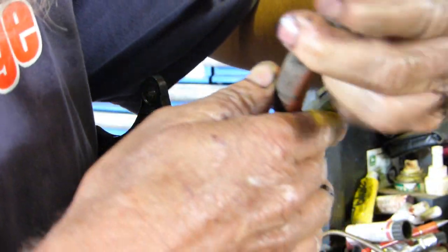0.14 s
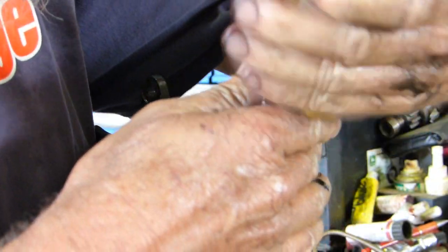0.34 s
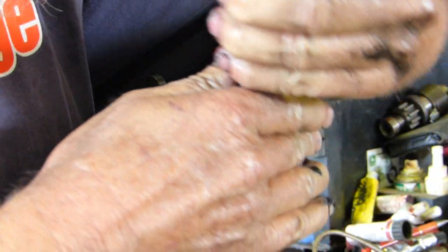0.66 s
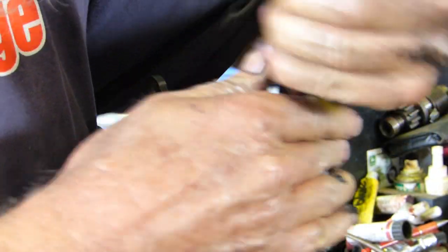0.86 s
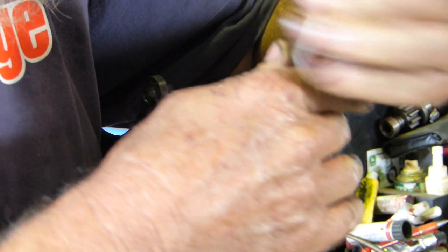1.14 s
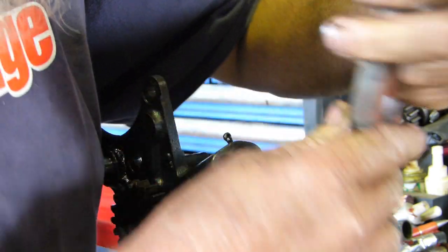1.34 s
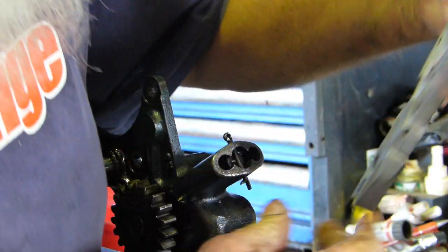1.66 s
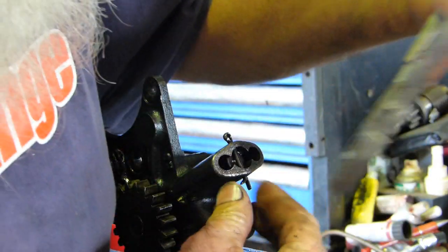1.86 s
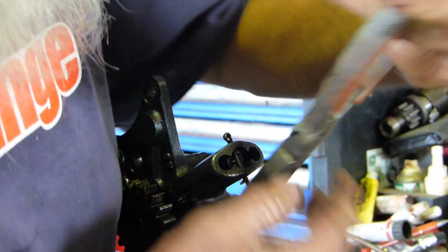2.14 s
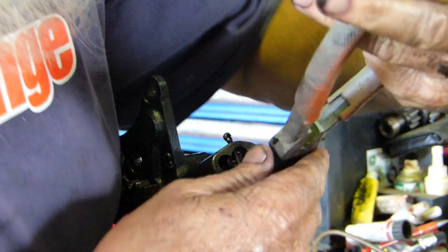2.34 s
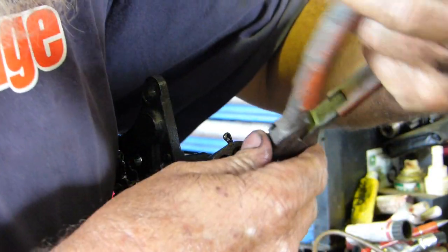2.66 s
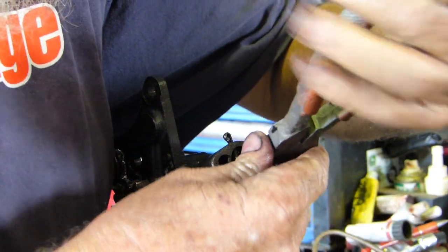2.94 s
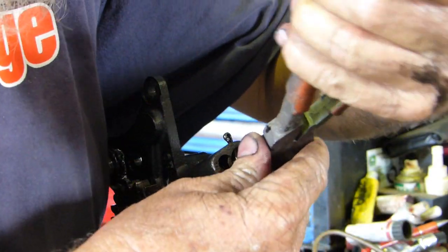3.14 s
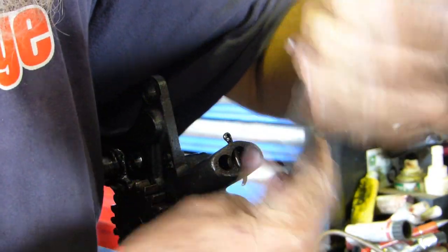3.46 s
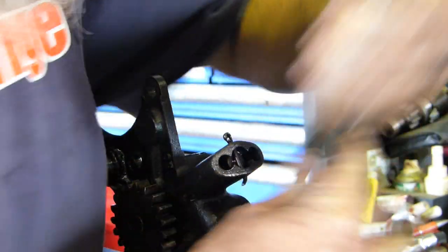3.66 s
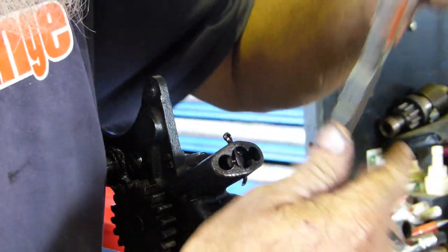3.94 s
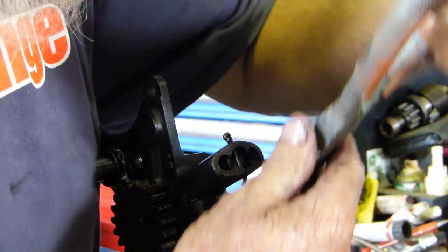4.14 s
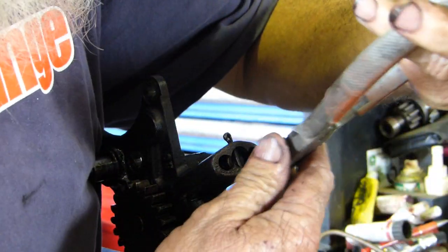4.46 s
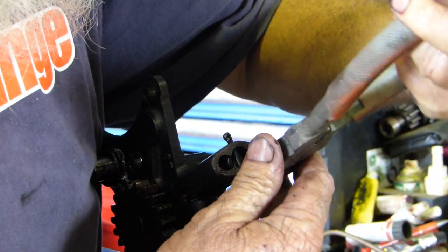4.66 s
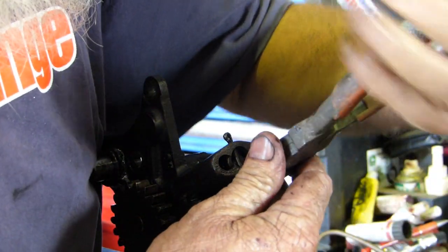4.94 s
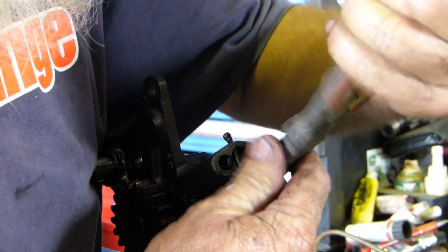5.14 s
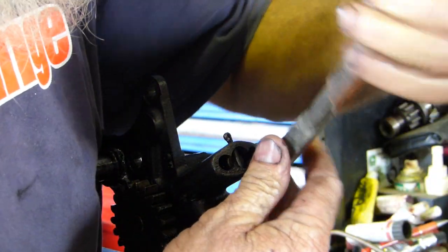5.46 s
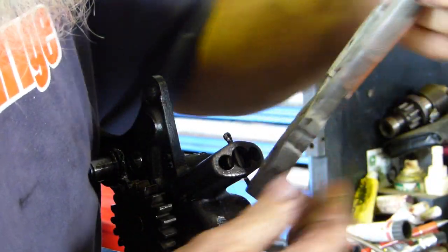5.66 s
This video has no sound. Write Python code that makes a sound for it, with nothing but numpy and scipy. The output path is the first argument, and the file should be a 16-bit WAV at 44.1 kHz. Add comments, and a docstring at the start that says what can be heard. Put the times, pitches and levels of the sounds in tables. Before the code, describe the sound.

Close-up hand work with steel pliers on a pin in a cast-iron body, in a bare workshop with a soft tail of about a second. A thin, fast-throbbing insect shrill around 7 kHz and faint outdoor air run throughout. At 0 s a faint hollow rub, a tick at 0.1, then near silence until a short creak and sharp snap at 0.96. A soft tap and slide come at 1.3-1.4. From 2.3 to 2.9, a cluster of bright ticks, scrapes and hollow knocks around 670 Hz bending quickly upward, strongest at 2.64. A light scrape starts at 3.27; two knocks at 3.6 surround the loudest event, a piercing, overloaded metallic crack at 3.62. Faint slides at 4.1-4.2, knocks and gritty taps at 4.5-4.9, then a clanking iron snap with a rattling rebound at 5.31 and a faint rub at 5.7. Distant rising bird chirps at 0.9, 1.75, 2.75 and 4.9.

```python
"""A faint rub of metal is heard first, over a high insect whine, then taps, hollow knocks and scrapes.
Steel pliers work a small pin in a cast-iron housing, close to the microphone in a bare workshop.
Contacts excite damped modes and noise; three times the jaws creak, snap off the pin and rebound.
Knocks are tones bending up in pitch; scrapes and rubs are filtered noise; a reverberant tail rings on.
Outside, a small bird whistles rising chirps now and then, and throbbing band noise forms the insects."""
import sys
import numpy as np
from scipy import signal
from scipy.fft import rfft, irfft
from scipy.io import wavfile
from scipy.ndimage import uniform_filter1d

SR = 44100
rng = np.random.default_rng(int(sys.argv[2]) if len(sys.argv) > 2 else 0)


def master(y):
    """Save y as 16-bit WAV."""
    cut = np.clip(np.atleast_2d(y).T, -1, 1)
    pcm = np.round(cut * 32767)  # scale
    wavfile.write(sys.argv[1], SR, pcm.astype(np.int16))


N = 256203
TIME = np.arange(N) / SR  # s


def undb(db):
    """Amplitude ratio: 20 dB is a factor of ten."""
    return 10 ** (np.asarray(db) / 20)


def unit(x):
    """Normalisation to a root-mean-square amplitude of 1."""
    return x / np.sqrt(np.mean(x ** 2))


def fade(t, t60):
    """Exponential decay, as of a linearly damped vibration: 60 dB down at t60."""
    return np.exp(-np.log(1000) * t / t60)


def lookup(points, hz, column=1):
    """Interpolation of a table column along a logarithmic frequency axis."""
    table = np.array(points, float)
    return np.interp(np.log(hz + 1), np.log(table[:, 0]), table[:, column])


def colour(x, points, tilt_db=0):
    """Linear filtering by a (f/Hz, level/dB) spectrum with an added tilt in dB per octave."""
    hz = np.fft.rfftfreq(x.shape[-1], 1 / SR)
    octaves = np.log2((hz + 1) / SR)
    gain = undb(lookup(points, hz) + tilt_db * octaves)
    return irfft(rfft(x) * gain, x.shape[-1])


def walk(rate_hz):
    """Slow random fluctuation: smoothed random steps with a spread near 1."""
    step = int(SR / rate_hz)
    steps = np.repeat(rng.standard_normal(N // step + 1), step)
    return unit(uniform_filter1d(steps, step)[:N])


def add(track, s, sound):
    """Linear superposition of a sound on a track from time s."""
    start = max(int(s * SR), 0)
    size = min(sound.shape[-1], N - start)
    track[..., start:start + size] += sound[..., :size]


def ring(modes, t):
    """Modal superposition after one tap, peak 1; neighbouring modes start in opposite senses."""
    total = np.zeros(len(t))
    for k, (hz, db, t60) in enumerate(modes):
        total += (-1) ** k * undb(db) * fade(t, t60) * np.sin(2 * np.pi * hz * t)
    return total / np.abs(total).max()


# jaws touching or biting the pin: t/s, crunch level/dB, spectral tilt/(dB per octave)
PIN_TAPS = [(0.093, -39.5, -3.5), (1.378, -52, -2), (2.333, -46.5, 11), (2.566, -51, 3), (2.6336, -36, 0.9),
            (2.852, -46.5, 3), (4.632, -36.5, -1), (4.897, -48, -2.5)]
# jaws slipping off the pin: t/s, jaw ring level/dB, casting ring level/dB, crunch level/dB,
# creak lead/s, creak level/dB, creak tilt/(dB per octave),
# rebound level re snap/dB, rebound decay time T60/s, rebound tilt/(dB per octave)
PIN_SLIPS = [(0.9642, -10.5, -34, -16, 0.011, -27.5, 6, 0, 0.045, -3.5),
             (3.6202, 2.5, -32.5, -14.5, .0215, -32, 1, -24, .06, 1),
             (5.3081, -18, -10.5, -17, 0.0054, -35, -2, -5, 0.21, -1)]
TAP_JAW_DB, TAP_IRON_DB = -20, -1.5  # ring re the tap's crunch
# crunch decay of a firm bite, that bite's level, and the drop in level that halves the decay
BITE_T60_S, BITE_DB, BITE_HALVING_DB = 0.1, -33, 15
CREAK_T60_S = 0.061  # crunch of the grip starting to give
CREAK_JAW_DB, CREAK_IRON_DB = -10, -1  # ring re the creak's crunch
SNAP_T60_S, SNAP_TILT_DB = 0.014, 6  # crunch decay; tilt per octave
REBOUND_S, REBOUND_CRUNCH_DB = 0.0046, -6.5  # delay after the snap; further change of the crunch


def contacts():
    """Impact and stick-slip: single taps, and slips that creak, snap and rebound.

    Yields time in s, jaw, casting and crunch levels in dB, crunch T60 in s, tilt in dB per octave.
    """
    for s, db, tilt_db in PIN_TAPS:
        bite_t60 = BITE_T60_S * 2 ** ((db - BITE_DB) / BITE_HALVING_DB)
        yield s, db + TAP_JAW_DB, db + TAP_IRON_DB, db, bite_t60, tilt_db
    for (s, jaw_db, iron_db, crunch_db, lead_s, creak_db, creak_tilt_db,
         rebound_db, rebound_t60, rebound_tilt_db) in PIN_SLIPS:
        creak_jaw_db, creak_iron_db = creak_db + CREAK_JAW_DB, creak_db + CREAK_IRON_DB
        yield s - lead_s, creak_jaw_db, creak_iron_db, creak_db, CREAK_T60_S, creak_tilt_db
        yield s, jaw_db, iron_db, crunch_db, SNAP_T60_S, SNAP_TILT_DB
        rebound_crunch_db = crunch_db + rebound_db + REBOUND_CRUNCH_DB
        yield (s + REBOUND_S, jaw_db + rebound_db, iron_db + rebound_db,
               rebound_crunch_db, rebound_t60, rebound_tilt_db)


# modes of the hand-damped pliers: f/Hz, relative level/dB, decay time T60/s
PLIERS_MODES = [(1660, -27.5, 0.022), (2390, -26.5, 0.025), (2800, -28, 0.019), (3988, -2.5, 0.013),
                (4160, -3, 0.0067), (5130, -6, 0.0041), (6090, -12, 0.015), (7300, -6, 0.0036),
                (8140, -3, 0.0026), (8840, -6, 0.0062), (10080, -10.5, 0.0033), (12100, -19, 0.0053)]
# modes of the casting and its lever: f/Hz, relative level/dB, decay time T60/s
CASTING_MODES = [(155, -36, 0.077), (298.4, -16.5, 0.14), (474, -14.5, 0.084), (517, -7.5, 0.048),
                 (702, 2, 0.037), (810, 1, 0.085), (937, 2.5, 0.011), (1208, -1.5, 0.091),
                 (1316, 0.5, 0.071), (1373, -4.5, 0.13), (1444, 0, 0.097), (4700, -12, 0.026)]
# spectrum of serrations crunching over the pin: f/Hz, relative level/dB
CRUNCH_SPECTRUM = [(60, -18), (140, -18), (220, -30), (300, 1), (400, 0.5), (600, 11.5), (1100, 0),
                   (1700, 2.5), (2200, -1), (3200, -2), (5200, -5), (8500, -9.5), (12000, -28),
                   (16000, -56)]


def blows(ring_room_db=-6.5, crunch_room_db=1.0, spread_s=0.026):
    """Modal excitation: contacts ring jaws and casting while the serrations crunch over the pin.

    Returns the near sound and the sound bound for the room.
    """
    near, outward, t = np.zeros(N), np.zeros(N), TIME[:SR // 2]
    jaws, iron = ring(PLIERS_MODES, t), ring(CASTING_MODES, t)
    for s, jaw_db, iron_db, crunch_db, t60, tilt_db in contacts():
        noise = rng.standard_normal((2, len(t)))
        grit = undb(crunch_db) * unit(colour(noise, CRUNCH_SPECTRUM, tilt_db))
        iron_ring = undb(iron_db) * iron
        add(near, s, undb(jaw_db) * jaws + iron_ring + grit[0] * fade(t, t60))
        # the jaws beam their ring at the microphone
        jaw_outward = undb(jaw_db + ring_room_db) * jaws
        # the crunch scatters off hands and bench, smeared in time
        long_t60 = t60 + spread_s
        scattered = grit[1] * fade(t, long_t60) * np.sqrt(t60 / long_t60)
        add(outward, s, jaw_outward + iron_ring + undb(crunch_room_db) * scattered)
    # small parts radiate almost no bass
    low_cut = signal.butter(4, 105, "high", fs=SR, output="sos")
    return signal.sosfilt(low_cut, near), signal.sosfilt(low_cut, outward)


# hollow knocks of the bored shaft: t/s, level/dB, decay time T60/s
SHAFT_KNOCKS = [(0.965, -34, 0.029), (2.365, -40, 0.072), (2.572, -46.5, 0.13), (2.636, -26.5, 0.079),
                (2.786, -32, 0.021), (2.813, -36.5, 0.032), (3.602, -31.5, 0.081), (3.629, -24, 0.031),
                (4.543, -35.5, 0.051), (4.634, -31.5, 0.078), (4.702, -40.5, 0.11), (4.785, -43, .045)]
# spectrum of the dull thud under each knock: f/Hz, relative level/dB
THUD_SPECTRUM = [(100, -62), (300, -7), (520, -2), (900, 10.5), (2000, -26), (6000, -50)]
KNOCK_HZ = 667  # the note on which every knock settles


def knocks(bend=0.34, settle_s=0.0048, swell_s=0.0025, choke=1.78, thud_db=-13):
    """Resonance under changing load: a note bends up as the jaws seat, then the grip chokes it."""
    out, t = np.zeros(N), TIME[:SR // 3]
    for s, db, t60 in SHAFT_KNOCKS:
        pitch = KNOCK_HZ * (1 - bend * np.exp(-t / settle_s))
        note = np.sin(2 * np.pi * np.cumsum(pitch) / SR)
        thud = unit(colour(rng.standard_normal(len(t)), THUD_SPECTRUM))
        swell = 1 - np.exp(-t / swell_s)
        decay = fade(t ** choke, t60 ** choke)  # steepens with time
        add(out, s, undb(db) * swell * decay * (note + undb(thud_db) * thud))
    return out


# pressing and rubbing on the shaft: t/s, length/s, level/dB
SHAFT_RUBS = [(0.0, 0.12, -50.5), (2.34, 0.12, -53.5), (2.533, 0.075, -47.5), (2.68, 0.25, -54),
              (4.698, 0.14, -51), (5.725, 0.064, -54.5)]
# resonance of the bored shaft: f/Hz, relative level/dB
BORE_SPECTRUM = [(120, -47), (300, -2.5), (480, 0.5), (580, 3.5), (650, 6.5), (740, -1.5), (950, -15),
                 (1400, -28), (2000, -35), (6000, -34)]


def rubs(grain_db=3):
    """Friction-driven resonance: dense small slips of the jaws keep the bored shaft humming."""
    pressure = np.zeros(N)
    for s, length_s, rub_db in SHAFT_RUBS:
        add(pressure, s, undb(rub_db) * np.sqrt(np.hanning(int(length_s * SR))))
    slips = rng.standard_normal(N) * undb(grain_db * walk(150))
    return pressure * unit(colour(slips, BORE_SPECTRUM))


# jaws and fingers sliding: t/s, decay time T60/s, level/dB
SLIDING_STROKES = [(0.345, 0.11, -62), (1.29, .08, -55), (2.349, 0.28, -56.5), (2.554, 0.34, -53.5),
                   (2.79, 0.15, -51.5), (3.265, 1, -51), (4.111, 0.28, -56.5), (4.215, 0.34, -57.5),
                   (5.15, 0.11, -60)]
# spectrum of a scrape before tilting: f/Hz, relative level/dB
SCRAPE_SPECTRUM = [(150, -9), (500, 8.5), (950, 12.5), (1400, 9.5), (1900, 3), (3400, 0), (4050, 2),
                   (4450, 2), (5200, -5), (9000, -5), (12000, -17), (16000, -40)]
SCRAPE_RISE_S = 0.021
# a firm scrape, its tilt per octave, and the tilt gained for each dB softer
FIRM_DB, FIRM_TILT_DB, BRIGHTENING = -50, 0.5, 1.4


def scrapes(grain_db=4):
    """Sliding friction: dense tiny slips of uneven size; a lighter touch sounds brighter."""
    out, t = np.zeros(N), TIME[:SR]
    for s, t60, db in SLIDING_STROKES:
        tilt_db = FIRM_TILT_DB + BRIGHTENING * (FIRM_DB - db)
        slip_size = undb(grain_db * rng.standard_normal(len(t)))
        slips = rng.standard_normal(len(t)) * slip_size
        rise = np.minimum(t / SCRAPE_RISE_S, 1)
        decay = fade(np.maximum(t - SCRAPE_RISE_S, 0), t60)
        add(out, s, undb(db) * rise * decay * unit(colour(slips, SCRAPE_SPECTRUM, tilt_db)))
    return out


# stereo balance of the close work at the microphone: f/Hz, left minus right level/dB
CLOSE_BALANCE = [(200, -7), (380, 3), (700, 2.5), (1300, -2.5), (2400, -4), (4400, -2.5), (8100, 3.5),
                 (12000, -.5)]


def place(x):
    """Interaural-style level difference: a close sound as the left and right ports hear it."""
    pan_db = lookup(CLOSE_BALANCE, np.fft.rfftfreq(N, 1 / SR))
    gains = undb(np.array([pan_db, -pan_db]) / 2)
    return irfft(rfft(x) * gains, N)


# rising bird chirps: t/s, start f/Hz of the stronger second harmonic, level/dB
BIRD_CHIRPS = [(0.893, 4600, -47), (1.748, 4340, -48), (2.738, 4480, -49.5), (4.903, 4180, -49)]
CHIRP_S, CHIRP_RISE = 0.053, 1.33  # length; end pitch over start pitch, before the quaver


def bird(curve=1.2, lower_db=-7):
    """Frequency modulation: quavering upward whistles whose second harmonic is the stronger."""
    out = np.zeros(N)
    u = np.linspace(0, 1, int(CHIRP_S * SR))  # progress through a chirp
    for s, start_hz, db in BIRD_CHIRPS:
        quaver = 1 + 0.02 * walk(900)[:len(u)]
        pitch = start_hz * (1 + (CHIRP_RISE - 1) * u ** curve) * quaver
        phase = np.pi * np.cumsum(pitch) / SR  # of the fundamental, at half that pitch
        swell = np.sqrt(u * np.abs(np.sin(np.pi * u)))
        whistle = np.sin(2 * phase) + undb(lower_db) * u * np.sin(phase)
        add(out, s, undb(db) * swell * whistle)
    return out


# stereo width of diffuse sound: f/Hz, side minus mid level/dB
DIFFUSE_WIDTH = [(60, -22), (200, -2), (600, 1), (2400, -4.5), (4400, -4.5), (7500, -10.5), (12000, 0)]


def diffuse(size):
    """Diffuse field: partly coherent stereo noise that arrives from all sides."""
    mid, side = rng.standard_normal((2, size))
    side = colour(side, DIFFUSE_WIDTH)
    return np.array([mid + side, mid - side])


# spectrum of the insects' shrilling: f/Hz, relative level/dB
INSECT_SPECTRUM = [(5800, -76), (6500, -24), (6950, -15), (7330, -10.5), (7800, -15.5), (8400, -23),
                   (9300, -44.5), (12000, -63)]


def insects(db=-52, pulse_hz=75):
    """Amplitude modulation: narrow-band shrilling throbs at the pulse rate of the nearest singer."""
    phase = 2 * np.pi * np.cumsum(pulse_hz * (1 + 0.011 * walk(5.9))) / SR
    throb = 1 + 0.2 * np.cos(phase) + 0.15 * np.cos(2 * phase)
    drift = undb(0.4 * walk(8))
    return undb(db) * unit(colour(diffuse(N) * throb * drift, INSECT_SPECTRUM))


# spectrum of the outdoor background: f/Hz, relative level/dB
AIR_SPECTRUM = [(20, -3), (60, -8), (100, -7), (140, 1.5), (320, 0), (800, 1), (1150, -2), (1500, -2.5),
                (2100, -8.5), (3500, -9), (5100, -6.5), (5900, -8), (11000, -14), (16000, -32.5)]
AIR_DB = -54


def air():
    """Stationary noise: soft, steady outdoor background through the open workshop."""
    return undb(AIR_DB) * unit(colour(diffuse(N), AIR_SPECTRUM))


# reverberation of the workshop: f/Hz, reverberant to direct energy level/dB, decay time T60/s
ROOM_BANDS = [(120, 8, 0.69), (296, 0.5, 0.62), (633, -7.5, 0.8), (765, -7, 1), (1250, -6, 1),
              (2360, -10, 0.98), (4160, -9, 0.95), (6960, -7.5, 0.78), (8900, -11.5, 0.84),
              (15000, -8.5, 0.36)]
# echoes from nearby surfaces: delay t/s, energy level/dB
SURFACE_ECHOES = [(.0122, -34), (.0232, -25)]


def room(x, gap_s=0.0009, build_s=0.0097):
    """Reverberation by convolution: early echoes and a diffuse tail whose decay varies with band."""
    t = TIME[:SR]
    hz, noise = np.fft.rfftfreq(SR, 1 / SR), rfft(diffuse(SR))
    onset = np.clip((t - gap_s) / build_s, 0, 1)
    response = np.zeros((2, SR))
    for k, (_, db, t60) in enumerate(ROOM_BANDS):
        # a triangle in log frequency: 1 at this band, 0 at its neighbours
        band = lookup([(row[0], j == k) for j, row in enumerate(ROOM_BANDS)], hz)
        envelope = onset * fade(t, t60)
        response += undb(db) * irfft(noise * band, SR) * envelope / np.linalg.norm(envelope)
    burst_t = t[:SR // 100]
    for delay_s, db in SURFACE_ECHOES:
        scatter = rng.standard_normal(len(burst_t)) * fade(burst_t, 0.0056)
        add(response, delay_s, undb(db) * scatter / np.linalg.norm(scatter))
    return signal.fftconvolve(x[None], response, axes=1)[:, :N]


def scene(knock_room_db=-3, bird_room_db=11):
    """Direct and reverberant fields: the work is close and mostly direct, the bird far."""
    metal, metal_outward = blows()
    hollow, sliding, chirps = knocks() + rubs(), scrapes(), bird()
    sent = metal_outward + undb(knock_room_db) * hollow + sliding + undb(bird_room_db) * chirps
    close = place(metal + hollow + sliding)
    return close + chirps + room(sent) + insects() + air()


TOP_HZ = 15700


def record(dry):
    """Clipping and band limitation: clips at full scale, cuts the top and sits slightly off zero."""
    offset = -0.0035
    top_cut = signal.ellip(8, 0.2, 70, TOP_HZ, fs=SR, output="sos")
    return signal.sosfilt(top_cut, np.clip(dry, -1, 1)) + offset


dry = scene()
out = record(dry)
master(out)
```